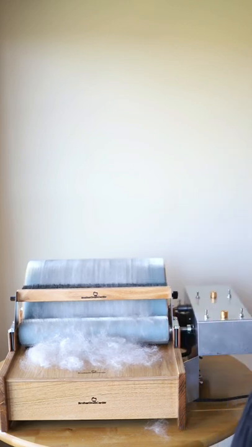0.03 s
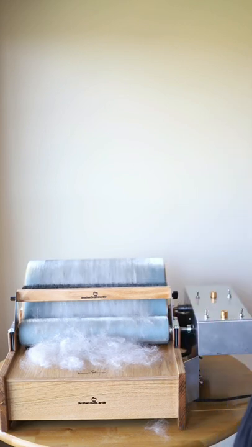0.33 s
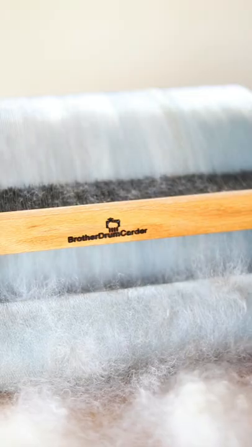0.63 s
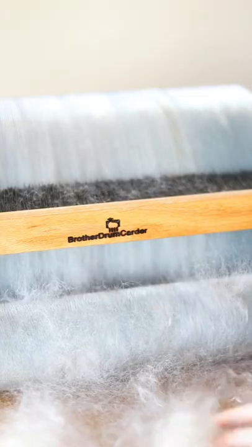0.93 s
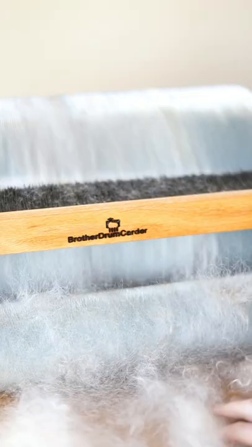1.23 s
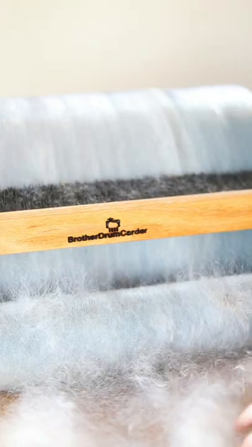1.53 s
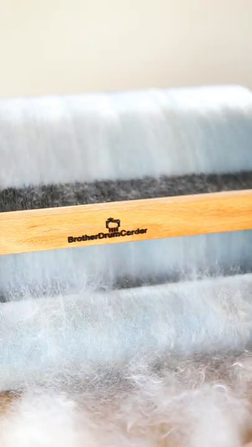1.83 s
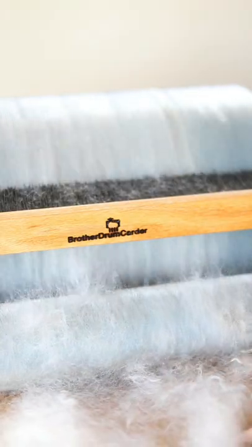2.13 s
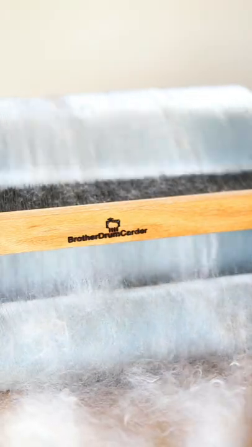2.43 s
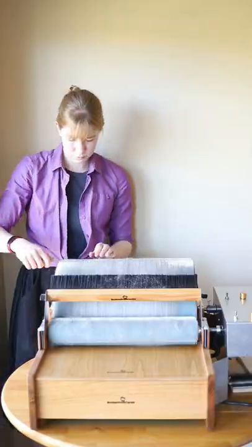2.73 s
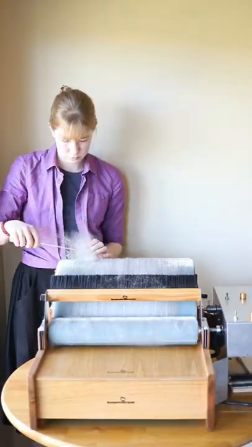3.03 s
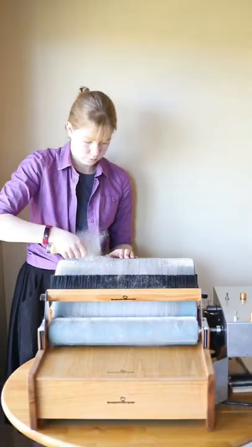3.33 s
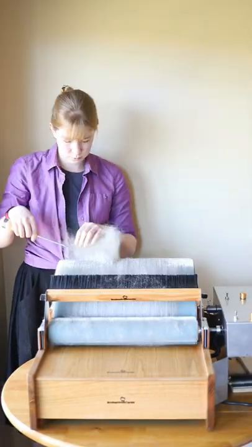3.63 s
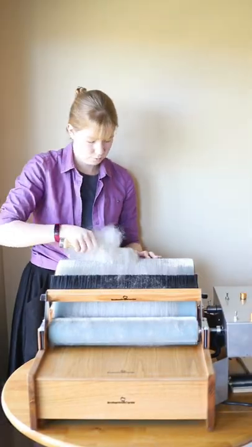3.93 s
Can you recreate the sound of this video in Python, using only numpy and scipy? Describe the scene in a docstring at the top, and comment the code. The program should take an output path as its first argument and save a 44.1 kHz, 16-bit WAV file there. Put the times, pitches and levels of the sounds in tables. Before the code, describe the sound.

A carding machine runs with a geared whine and a hiss of wire teeth, growing louder as the microphone jumps close. The sound stops dead, leaving a quiet room with brief metallic scrapes and faint fiber rustling.

```python
"""A whining, rushing drum carder, heard from across the table in a small room: its geared motor whines, the
wooden frame drones, and wire teeth rush through fiber and brush. Then the microphone is close up, and the level
dips briefly three times. Then the scene changes to the machine standing still: over a faint hum, broken by one
short silence, a metal pick scrapes across the drum's wire teeth and fiber rustles as it is lifted off."""
import sys
import numpy as np
from scipy import signal
from scipy.fft import rfft, irfft
from scipy.io import wavfile

SR = 44100
rng = np.random.default_rng(int(sys.argv[2]) if len(sys.argv) > 2 else 0)


def master_out(mix):
    """Clip the mix to full scale and print it as 16-bit PCM to the path in sys.argv[1]."""
    frames = np.transpose(np.atleast_2d(mix))
    ceiling = np.clip(frames, -1, 1)
    pcm = np.round(ceiling * 32767).astype(np.int16)
    wavfile.write(sys.argv[1], SR, pcm)


N = 176400
T = np.arange(N) / SR
HZ = np.fft.rfftfreq(N, 1 / SR)
CLOSE_S, STOP_S = 0.622, 2.661  # the microphone is close up; the scene changes to the still machine

# Stereo image of the room hiss and the fiber: (frequency [Hz], left-right correlation [-1..1])
ROOM_IMAGE = [(150, 0.74), (600, .25), (5000, 0.33)]
# Stereo image of the teeth under the pick: (frequency [Hz], left-right correlation [-1..1])
WIRE_IMAGE = [(2000, 0.34), (7000, 0.71), (15000, .2)]


def amp(db):
    """Decibels to gain."""
    return 10 ** (np.asarray(db) / 20)


def unit(x):
    """Scales to rms 1."""
    return x / np.sqrt(np.mean(x ** 2) + 1e-20)


def curve(points):
    """Spreads (frequency, value) points over the spectrum on a log-frequency axis."""
    hz, value = np.transpose(points)
    return np.interp(np.log(HZ + 1), np.log(hz + 1), value)


def drift(rate_hz):
    """Random motion of rms 1, mostly slower than rate_hz."""
    return unit(irfft(rfft(rng.standard_normal(N)) * np.exp(-(HZ / rate_hz) ** 2), N))


def colour(x, spectrum, image, resonances=(), lean_db=0):
    """Gives two unrelated signals a spectrum, resonances and a stereo image, at rms 1."""
    peaks = sum((amp(db) ** 2 - 1) / (1 + (2 * (HZ - hz) / width) ** 2) for hz, width, db in resonances)
    gain = amp(curve(spectrum)) * np.sqrt(1 + peaks)
    correlation = curve(image)
    a, b = rfft(x) * gain
    mid, side = a * np.sqrt(1 + correlation), b * np.sqrt(1 - correlation)
    left, right = (mid + side) * amp(lean_db / 2), (mid - side) * amp(-lean_db / 2)
    return unit(irfft(np.array([left, right]), N))


def reflect(x, wet, t60):
    """Table and walls add a short tail of sparse reflections."""
    t = T[:SR // 3]
    taps = rng.standard_normal((2, len(t))) * (rng.random((2, len(t))) < 1 / 20)
    taps *= np.exp(-np.log(1000) * t / t60)
    return x + wet * signal.fftconvolve(x, taps / np.linalg.norm(taps[0]), axes=1)[:, :N]


def uneven_fiber(x, patch_db, patch_hz, patch_s):
    """Uneven fiber makes patches of the spectrum swell and fade."""
    f, t, frames = signal.stft(x, SR, nperseg=512, noverlap=384)
    across = np.fft.fftfreq(len(f), f[1])[:, None] * patch_hz
    along = np.fft.fftfreq(len(t), t[1]) * patch_s
    smooth = np.exp(-across ** 2 - along ** 2)
    patches = unit(np.fft.ifft2(np.fft.fft2(rng.standard_normal(smooth.shape)) * smooth).real)
    return signal.istft(frames * amp(patch_db * patches), SR, nperseg=512, noverlap=384)[1][:, :N]


def rush(flicks_per_s=5000, spread_db=1.5, flick_share=0.33):
    """Thousands of single teeth flick through the brush amid the hiss of fiber."""
    size = amp(spread_db * np.minimum(rng.exponential(1, (2, N)), 5))
    flicks = size * rng.choice([-1, 1], (2, N)) * (rng.random((2, N)) < flicks_per_s / SR)
    hiss = rng.standard_normal((2, N))
    teeth = np.sqrt(flick_share) * unit(flicks) + np.sqrt(1 - flick_share) * hiss
    return uneven_fiber(reflect(teeth, wet=0.27, t60=0.18), patch_db=0.71, patch_hz=1490, patch_s=0.064)


def far_teeth():
    """The rush of the teeth sounds through the frame, heard from across the table."""
    # Rush at a distance: (frequency [Hz], relative level [dB])
    spectrum = [(40, -24), (166, -22), (225, -12.5), (268, -14.5), (380, -13), (643, -10.5), (1060, -4.5),
                (1880, -10), (5810, -10.5), (12600, -20.5), (15800, -29)]
    # Its stereo image: (frequency [Hz], left-right correlation [-1..1])
    image = [(550, 0.87), (1100, .45), (1900, -0.11), (6000, 0.19), (15000, -0.27)]
    # Frame and drum resonances: (frequency [Hz], width [Hz], boost [dB])
    body = [(373, 27, 2.5), (1080, 150, 1)]
    return amp(-28) * colour(rush(), spectrum, image, body, lean_db=0.7)


def frame_drone(flutter=0.3, fade_s=0.56):
    """Two low, unsteady tones of the wooden frame beat against each other and die away."""
    # Frame tones: (frequency [Hz], starting level [dB])
    tones = [(220, -51), (235, -45.5)]
    out = np.zeros(N)
    for hz, db in tones:
        waver = 1 + flutter * drift(8)
        phase = 2 * np.pi * hz * T + 2 * flutter * drift(6.7)
        out += amp(db) * unit(waver * np.sin(phase))
    return out * np.exp(-(T / fade_s) ** 4)


def gear_whine(close, wander=0.0026, flutter=0.4):
    """Gear mesh tones waver with the load on the drum; close up, the third harmonic swells and ebbs."""
    # Motor speed: (time [s], gear mesh pitch [Hz])
    mesh = [(0, 565.7), (.58, 566.5), (.72, 562.7), (1.3, 564.9), (2.65, 563.2)]
    # Gear tones: (multiple of mesh pitch, far level [dB], close base level [dB], right lag [rad])
    partials = [(1, -41, -40.5, 0.68), (1.5, -65, -53, .5), (2, -47.5, -38, 0.86), (2.25, -49, -45, 2.2),
                (3, -47.5, -41, 1.75)]
    # Swell of the third harmonic: (time [s], gain [dB])
    swells = [(.65, -4), (1.18, -5), (1.245, 9.5), (1.31, 2), (1.49, 1), (1.57, -1.5), (2.3, -1), (2.52, 4)]
    pitch_hz = np.interp(T, *np.transpose(mesh)) * (1 + wander * drift(9.1))
    cycles = np.cumsum(pitch_hz) / SR
    out = np.zeros((2, N))
    for multiple, far_db, close_db, lag in partials:
        phase = 2 * np.pi * (multiple * cycles + rng.random()) - np.array([[0], [lag]])
        tone = (1 + flutter * drift(39)) * np.cos(phase) + flutter * drift(24) * np.sin(phase)
        swell_db = np.interp(T, *np.transpose(swells)) * (multiple == 3)
        out += unit(tone) * amp(np.where(close, close_db + swell_db, far_db))
    return out


def room():
    """The small room's soft hiss and thin electrical hum lie under everything."""
    # Room hiss: (frequency [Hz], relative level [dB])
    spectrum = [(24, -46), (96, -39), (170, -19), (245, -16), (350, -13), (611, -9.5), (900, -8.5),
                (1200, -4), (1580, -8), (2480, -4.5), (2950, -7), (4300, -6.5), (8000, -11), (11500, -13),
                (15800, -11.5)]
    # Resonance in the hiss: (frequency [Hz], width [Hz], boost [dB])
    ring = [(3670, 200, 4.5)]
    # Electrical hum: (frequency [Hz], level [dB])
    tones = [(301, -76.5), (598, -78), (1238, -72.5), (2562, -72), (3298, -74), (3630, -77.5)]
    hum = sum(amp(db) * unit(np.sin(2 * np.pi * hz * T + 0.25 * drift(6))) for hz, db in tones)
    return amp(-55.5) * colour(rng.standard_normal((2, N)), spectrum, ROOM_IMAGE, ring) + hum


def fiber_load(x, roar_hz=950, rasp_hz=2270, width_octaves=0.28):
    """A roar and a rasp in the rush swell and ease with the fiber in the teeth."""
    # The drum takes up fiber: (time [s], roar gain [dB], rasp gain [dB])
    uptake = [(.645, -3.5, -0.5), (.69, -1, 1.5), (.8, -0.5, 0), (1.2, -0.5, -2), (1.6, -0.5, -1),
              (1.85, 2, -3.5), (2.15, -1, 0), (2.4, 2, -2.5), (2.65, -0.5, -2)]
    times, roar_db, rasp_db = np.transpose(uptake)
    out = x
    for hz, db in (roar_hz, roar_db), (rasp_hz, rasp_db):
        band = irfft(rfft(x) * np.exp(-(np.log2((HZ + 1) / hz) / width_octaves) ** 2), N)
        out = out + band * (amp(np.interp(T, times, db)) - 1)
    return out


def close_teeth():
    """With the microphone close up, the rush is louder and follows the load of fiber."""
    # Rush close up: (frequency [Hz], relative level [dB])
    spectrum = [(24, -37), (50, -28.5), (91, -28.5), (130, -20), (175, -21.5), (210, -13), (430, -9.5),
                (500, -11.5), (620, -11), (830, -6.5), (1150, -3.5), (1600, -9.5), (2200, -3.5), (2900, -7),
                (4300, -7.5), (5500, -4), (7700, -9), (8800, -9.5), (13600, -18), (15800, -22.5)]
    # Its stereo image: (frequency [Hz], left-right correlation [-1..1])
    image = [(400, 0.88), (750, 0.8), (1300, 0.37), (1800, 0.19), (2400, 0.59), (4400, 0.21), (6300, .05),
             (9000, 0.23)]
    # Frame and drum resonances: (frequency [Hz], width [Hz], boost [dB])
    body = [(148.5, 4.4, 11.3), (203, 45, 3.4), (850, 69, 3.9), (970, 29, 3.6), (2200, 250, 3)]
    # Balance at the microphone: (frequency [Hz], left minus right [dB])
    lean = [(400, 1.5), (950, 0.5), (2380, -1.1), (6000, -.6), (15000, 0.5)]
    return amp(-22.5) * fiber_load(colour(rush(), spectrum, image, body, curve(lean)))


def carder(stop_fade_s=0.0016):
    """The running machine, from across the table and then close up, until the scene changes."""
    close = T > CLOSE_S
    far_rush, close_rush = far_teeth(), close_teeth()
    machine = np.where(close, close_rush, far_rush + frame_drone()) + gear_whine(close)
    return machine * np.exp(-np.maximum(T - STOP_S, 0) / stop_fade_s)


def fiber_rustle():
    """Soft, finely grained swishes of fiber leaving the teeth."""
    # Pulls off the drum: (centre time [s], half length [s], level [dB])
    pulls = [(2.682, 0.048, -51.5), (2.85, 0.05, -60), (3.498, .06, -58), (3.803, 0.054, -58),
             (3.907, 0.053, -59)]
    # Fiber swish: (frequency [Hz], relative level [dB])
    spectrum = [(150, -33), (2000, -4), (5200, -5), (8300, 5), (11000, -3.5), (15500, -5)]
    envelope = sum(amp(db) * np.exp(-((T - centre) / half) ** 2) for centre, half, db in pulls)
    grains = rng.standard_normal((2, N)) * amp(2.3 * drift(400))
    return envelope * colour(grains, spectrum, ROOM_IMAGE)


def pick_scrapes(treble_hz=11000):
    """Each catch of the metal pick sets a cluster of wire teeth chattering and ringing."""
    # Catches: (time [s], rise [s], decay [s], level [dB], treble gain [dB], relative ping level [dB])
    catches = [(2.694, 0.012, 0.016, -42, 5, -3), (2.742, .005, 0.015, -49, 5, 7),
               (2.7745, .003, 0.008, -42, -12, -15), (3.0942, .0006, 0.011, -37, -6, -12),
               (3.108, 0.011, 0.012, -39, 3, -7), (3.296, .003, .024, -55, -8, 0),
               (3.6995, 0.0006, 0.0097, -37.5, -2, -10), (3.710, .003, 0.006, -39, 6, -7),
               (3.7205, .0015, 0.008, -32.5, 12, -5), (3.731, .004, 0.013, -32.5, 3, -10),
               (3.747, .004, .005, -38, -7, -2), (3.758, .003, .009, -44, 1, 1)]
    # Chatter of the teeth: (frequency [Hz], relative level [dB])
    wire_spectrum = [(100, -50), (2300, -7), (4100, -15), (5200, 0), (6000, -5.5), (6600, 0), (9700, -4),
                     (11000, -6.5), (12500, -5.5), (13800, 3), (16000, 0.5)]
    # Ring of the teeth: (frequency [Hz], width [Hz], boost [dB])
    wire_modes = [(6740, 170, 17), (6900, 190, 20), (7550, 150, 6), (9000, 1100, 3), (14400, 400, 6),
                  (15550, 450, 12)]
    # Higher ping of stiffer teeth: (frequency [Hz], relative level [dB])
    ping_spectrum = [(4500, -45), (7000, 0), (9700, -2), (11500, -20)]
    # Ring of the stiffer teeth: (frequency [Hz], width [Hz], boost [dB])
    ping_modes = [(7570, 160, 17), (8800, 400, 10)]
    chatter = rng.standard_normal((2, N)) * amp(1.4 * drift(600))
    ring = colour(chatter, wire_spectrum, WIRE_IMAGE, wire_modes)
    treble = irfft(rfft(ring) * (HZ > treble_hz), N)
    ping = colour(rng.standard_normal((2, N)), ping_spectrum, WIRE_IMAGE, ping_modes)
    out = np.zeros((2, N))
    for start, rise, decay, db, treble_db, ping_db in catches:
        envelope = np.clip((T - start) / rise, 0, 1) * np.exp(-np.maximum(T - start - rise, 0) / decay)
        out += amp(db) * envelope * unit(ring + (amp(treble_db) - 1) * treble + amp(ping_db) * ping)
    return out


def tooth_snaps():
    """A tooth slips free of the pick with a dry snap."""
    # Slips: (time [s], decay [s], level [dB])
    slips = [(2.7737, 0.0098, -36), (3.0942, .0016, -39), (3.6985, .0013, -42)]
    # Snap of one tooth: (frequency [Hz], relative level [dB])
    spectrum = [(120, -55), (1400, -17), (2400, 1), (4000, -11), (6000, -3), (7000, 5), (8600, 7),
                (10500, -3), (15500, 1.5)]
    envelope = sum(amp(db) * (T > start) * np.exp(-abs(T - start) / decay) for start, decay, db in slips)
    return envelope * colour(rng.standard_normal((2, N)), spectrum, WIRE_IMAGE)


def scene():
    """The carder runs in the small room; then the pick lifts the fiber off the still drum."""
    return carder() + room() + fiber_rustle() + reflect(pick_scrapes() + tooth_snaps(), wet=0.13, t60=0.26)


def record(dry, silent_from_s=2.931, silent_to_s=3.032, top_hz=15920):
    """The sound dips briefly three times, drops once into silence, and its treble ends steeply."""
    # Brief dips in level: (time [s], fall [s], recovery [s], depth [dB])
    dips = [(0.622, 0.0083, 0.018, -13), (1.282, 0.011, 0.017, -5.5), (2.472, 0.012, .016, -7)]
    dips_db = sum(np.interp(T, [s - fall, s, s + recovery], [0, db, 0]) for s, fall, recovery, db in dips)
    audible = (T < silent_from_s) | (T > silent_to_s)
    lowpass = signal.firwin(511, top_hz, window=("kaiser", 9), fs=SR)
    return signal.oaconvolve(dry * amp(dips_db) * audible, lowpass[None], "same")


dry = scene()
out = record(dry)
master_out(out)
```